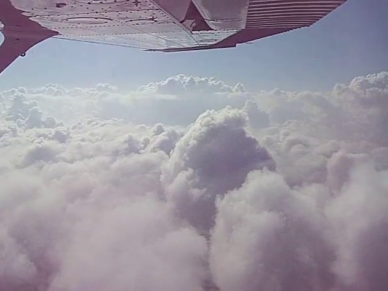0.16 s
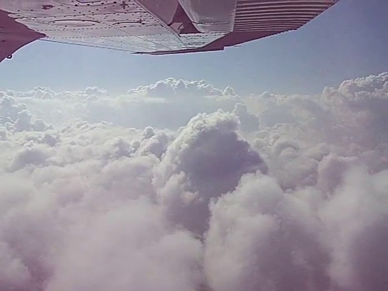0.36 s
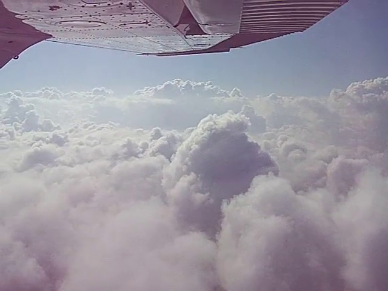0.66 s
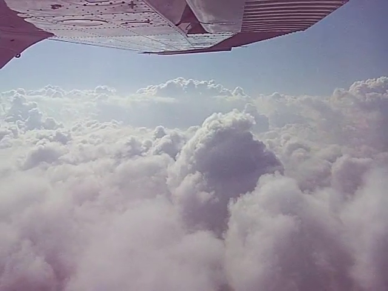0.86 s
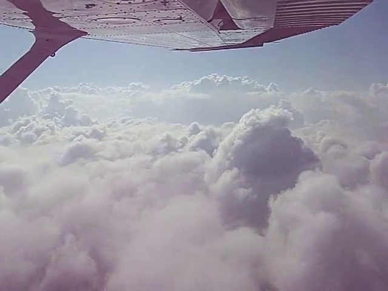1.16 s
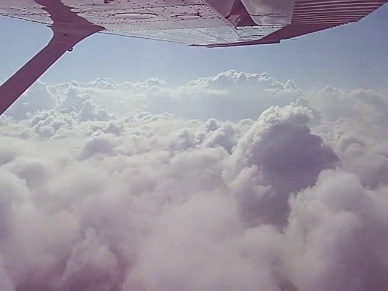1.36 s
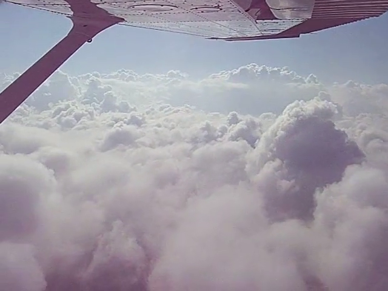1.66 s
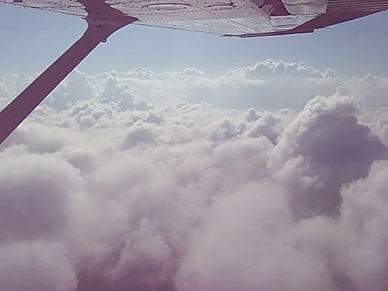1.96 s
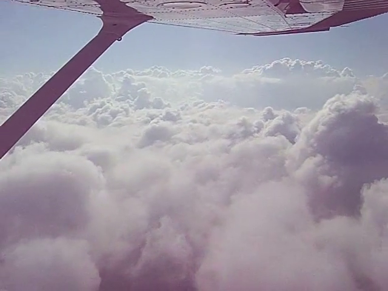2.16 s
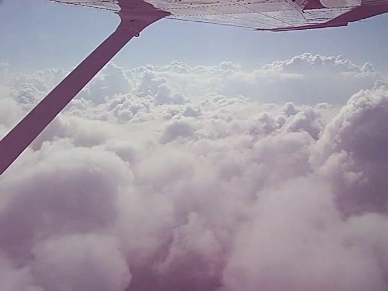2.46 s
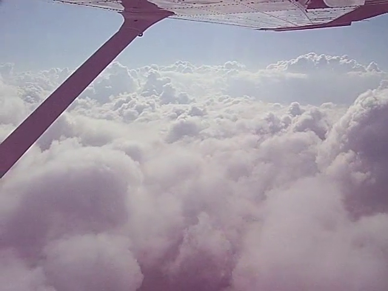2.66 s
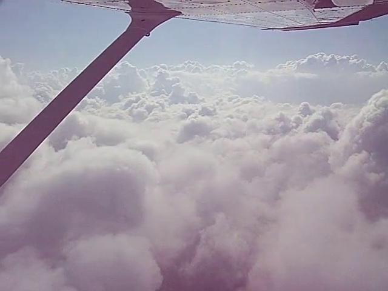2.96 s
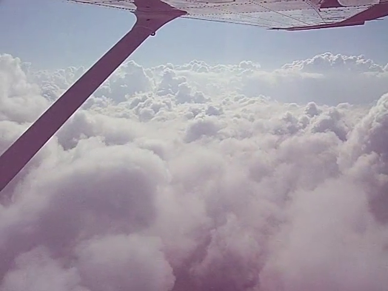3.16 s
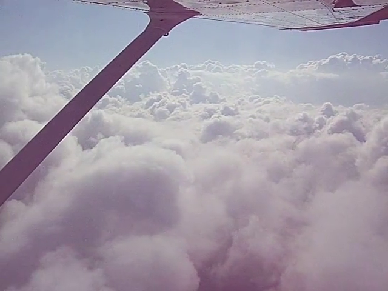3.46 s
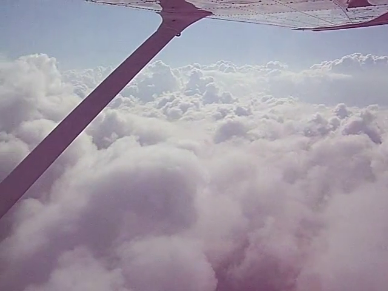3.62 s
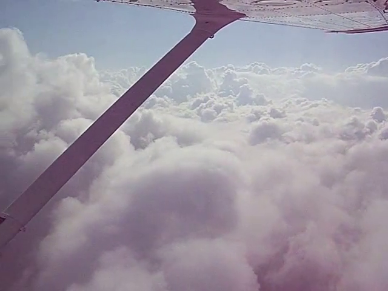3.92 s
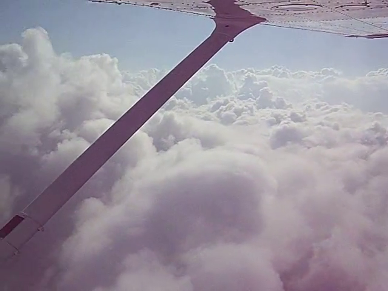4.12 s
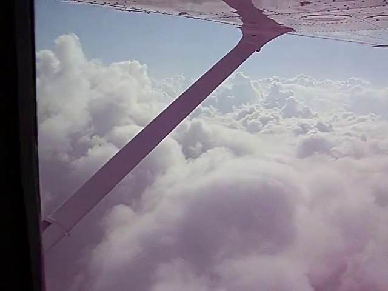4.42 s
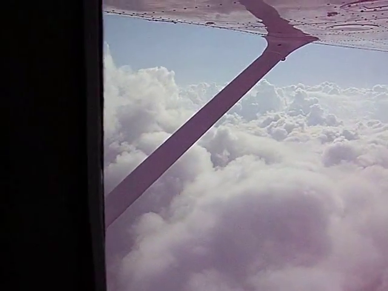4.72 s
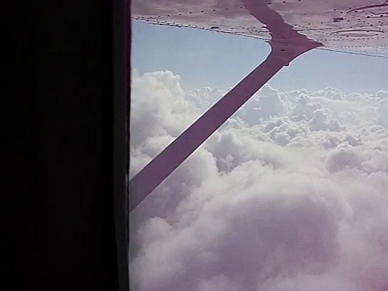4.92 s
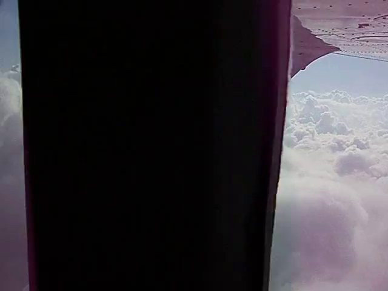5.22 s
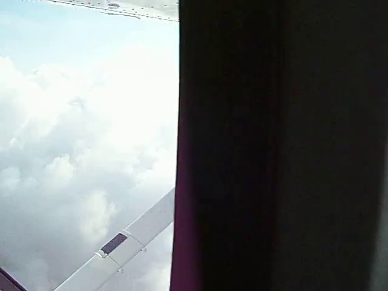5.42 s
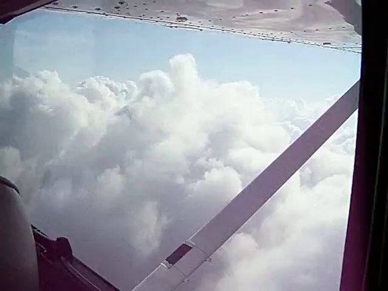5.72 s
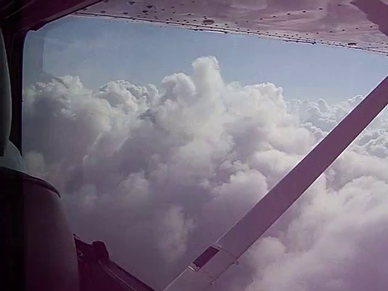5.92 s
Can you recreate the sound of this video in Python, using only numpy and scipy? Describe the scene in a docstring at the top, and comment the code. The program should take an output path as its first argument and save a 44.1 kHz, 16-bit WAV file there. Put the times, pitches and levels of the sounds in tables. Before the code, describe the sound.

Inside a light aircraft cabin, a deep four-cylinder engine and propeller drone dominates without pause, with a rough exhaust rumble and steady air rush beneath. For over four seconds little changes. Then, as the microphone turns along the side window to the door frame, the low tone eases, the air turns hollow and brighter, and short gusts push through the leaks.

```python
"""A deep drone dominates throughout: a four-cylinder engine and its propeller, in a light aircraft's cabin.
Sine harmonics locked to one shaft angle make the drone and its buzz; shaped noise makes the exhaust roar,
the slipstream on the skin, the hiss at the window seals and the resonant and broad leaks at the door.
The listening direction turns along the side window, from the wing tip towards the draughty door frame,
and recolours them all, with a comb-like window reflection; a few gusts push in near the end."""
import sys
import numpy as np
from scipy import signal
from scipy.fft import rfft, irfft, next_fast_len
from scipy.io import wavfile
from scipy.ndimage import uniform_filter1d, map_coordinates

SR = 44100
rng = np.random.default_rng(int(sys.argv[2]) if len(sys.argv) > 2 else 0)


def transcribe(signal):
    """Save signal, clipped to [-1, 1], as a 16-bit WAV file at the path in sys.argv[1]."""
    frames = np.atleast_2d(signal).T
    limited = np.clip(frames, -1, 1)
    pcm = np.round(limited * 32767).astype(np.int16)
    wavfile.write(sys.argv[1], SR, pcm)


N = 268128

# engine speed; a cycle is two turns of the shaft: (time [s], four-stroke cycle rate [Hz])
CYCLE_RATE = [(0, 19.2), (.75, 19.278), (3, 19.312), (5.2, 19.372)]
# turn of the listening direction: (time [s], turn [0 = facing the wing tip, 1 = past the door frame])
LISTENING_TURN = [(0, 0), (3.9, .08), (4.75, .21), (5.15, .32), (5.45, .56), (5.7, .95), (6.08, 1)]

# rms level of the firing tone before its fluctuations: (wing tip [dB], door frame [dB])
FIRING_DB = (-17.5, -20.5)
# rms level of its octave before its fluctuations: (wing tip [dB], door frame [dB])
OCTAVE_DB = (-21.5, -22.5)
# weaker engine and propeller lines, before beaming and flutter: (multiple of cycle rate, peak level [dB])
WEAK_ORDERS = [(1, -29), (2, -43.5), (3, -42), (5, -34), (7, -46.5), (9, -33), (10, -36.5), (11, -35.5),
               (12, -36.5), (13, -50), (16, -44), (18, -44.5), (20, -46), (22, -49.5), (24, -41), (26, -53),
               (28, -50.5), (29, -58), (30, -60.5), (32, -48), (33, -56.5), (36, -62), (37, -58.5),
               (38, -54), (39, -58), (40, -49.5), (41, -49.5), (44, -46.5), (48, -56.5)]
# change of the fully beamed weak lines: (wing tip [dB], door frame [dB])
BUZZ_DB = (2, -1.5)

# spectrum of exhaust and panel noise: (frequency [Hz], relative density [dB per Hz])
ROAR_SPECTRUM = [(8, -31.5), (22, -7), (45, -1), (68, 2.5), (90, -3), (135, -4), (212, -7), (270, -10.5),
                 (340, -12.5), (520, -21.5), (800, -25.5), (1100, -31), (2500, -68.5)]
# spectrum of the cabin standing wave: (frequency [Hz], relative density [dB per Hz])
BOOM_SPECTRUM = [(200, -32), (280, -6.5), (312, 2.5), (350, -3), (390, -18.5), (500, -49.5)]
# level of the standing wave: (wing tip [dB], door frame [dB])
BOOM_DB = (-49, -34)

# spectrum of the air rushing over the skin: (frequency [Hz], relative density [dB per Hz])
SLIPSTREAM_SPECTRUM = [(200, -0.5), (600, 3.5), (850, 4), (1100, 0.5), (1700, -0.5), (2350, -3), (2850, 0),
                       (3250, -2.5), (3650, -10.5), (4150, -27.5), (5000, -56)]
# level of the slipstream before its fluctuations: (wing tip [dB], door frame [dB])
SLIPSTREAM_DB = (-34, -34)
# spectrum of the window seals' hiss before tilting: (frequency [Hz], relative density [dB per Hz])
HISS_SPECTRUM = [(3000, -33), (4200, -16), (4700, -6.5), (5100, -3), (5800, -1.5), (6400, -3), (7000, 0),
                 (7500, 2), (7950, 0), (8350, -9), (8700, -20.5), (9000, -49.5)]
# hiss level, growing as the seal is approached, before tilt and flicker: (time [s], level [dB])
HISS_LEVEL = [(0.2, -44), (5.32, -41.5), (5.69, -38.5), (6.0, -38.5)]

# resonant gap in the door frame, before buffeting: (nearest turn [0-1], reach [turn], level there [dB])
GAP_PLACE = (0.25, .18, -42)
# hollow at the pillar, before buffeting: (nearest turn [0-1], reach [turn], level there [dB])
HOLLOW_PLACE = (0.39, .1, -37)
# broad draught, before buffeting: (nearest turn [0-1], reach [turn], level there [dB])
DRAUGHT_PLACE = (0.87, 0.55, -38.5)
# spectrum of the broad draught: (frequency [Hz], relative density [dB per Hz])
DRAUGHT_SPECTRUM = [(700, -25), (1200, -11), (1600, -1.5), (2000, -1.5), (2400, -5), (2950, -6.5),
                    (3500, -10.5), (4150, -27), (5000, -50)]
# gusts at the door frame, before buffeting: (time [s], half length [s], draught level [dB], gap level [dB])
GUSTS = [(5.634, .06, -36.5, -46), (5.7, .04, -43, -38), (5.87, 0.058, -44, -54)]

# extra path of the pane's reflection: (wing tip [ms], door frame [ms])
PANE_DELAY_MS = (0.19, 0.88)
# strength of that reflection: (strongest turn [0-1], reach [turn], gain there [dB])
PANE_PLACE = (0.31, .42, -9.5)


def amp(db):
    """Decibels are a logarithmic measure of amplitude gain."""
    return 10 ** (np.asarray(db) / 20)


def unit(x):
    """Normalisation: division by the root mean square gives rms 1."""
    return x / np.sqrt(np.mean(x ** 2) + 1e-20)


def curves(rows):
    """Linear interpolation: one value per sample for each column after the time."""
    times, *columns = np.transpose(rows)
    return [np.interp(np.arange(N) / SR, times, column) for column in columns]


def wobble(rate):
    """Slow random fluctuation: a smooth curve through normal deviates, rate knots a second."""
    knots = rng.standard_normal(256)
    coarse = np.linspace(0, N, 2048)
    values = map_coordinates(knots, [coarse * rate / SR], mode="mirror")
    return np.interp(np.arange(N), coarse, values)


def filtered(x, response):
    """Linear filtering: the spectrum of x is multiplied by a response of frequency."""
    size = next_fast_len(N + SR // 2)
    hz = np.fft.rfftfreq(size, 1 / SR)
    return irfft(rfft(x, size) * response(hz), size)[:N]


def noise(spectrum):
    """Spectral shaping: white noise coloured by points on a log-frequency axis, at rms 1."""
    f, db = np.transpose(spectrum)

    def response(hz):
        return amp(np.interp(np.log(hz + 1), np.log(f), db))
    return unit(filtered(rng.standard_normal(N), response))


def cavity(centre_hz, width_hz):
    """Resonance: a cavity selects one band of the air noise, at rms 1."""
    def response(hz):
        return (1 + ((hz - centre_hz) / width_hz) ** 2) ** -2
    return unit(filtered(rng.standard_normal(N), response))


def turned(ends):
    """Directional dependence: a value moves from its first end to its second with the turn."""
    turn, = curves(LISTENING_TURN)
    return ends[0] + (ends[1] - ends[0]) * turn


def bell(x, centre, reach, db):
    """Gaussian weighting: a gain peaks at the centre and fades to both sides."""
    return amp(db) * np.exp(-((x - centre) / reach) ** 2)


def passing(place):
    """Proximity: the gain of a place rises as the turn nears it and falls beyond."""
    turn, = curves(LISTENING_TURN)
    return bell(turn, *place)


def crank():
    """Phase is the integral of frequency: the cycle angle [rad], with a slight unsteadiness of the shaft."""
    rate, = curves(CYCLE_RATE)
    return 2 * np.pi * np.cumsum(rate) / SR + .004 * wobble(7)


def drone(angle, combustion_db):
    """Periodic excitation: four firings and four blade passes a cycle sound a deep tone and its octave."""
    firing_db = turned(FIRING_DB) + combustion_db * wobble(9)
    octave_db = turned(OCTAVE_DB) + .15 * wobble(9)
    firing = amp(firing_db) * np.sin(4 * angle)
    octave = amp(octave_db) * np.sin(8 * angle)
    return np.sqrt(2) * (firing + octave)  # rms to peak


def overtones(angle, flutter_db, beam_hz):
    """Fourier series: unequal cylinders fill in lines between blade harmonics; turbulence flutters each."""
    buzz_db = turned(BUZZ_DB)
    total = np.zeros(N)
    for order, db in WEAK_ORDERS:
        line_hz = order * CYCLE_RATE[0][1]
        beamed = min(line_hz / beam_hz, 1)  # higher lines depend more on the listening direction
        phase = rng.uniform(0, 2 * np.pi) + .2 * wobble(5)
        level_db = db + beamed * buzz_db + flutter_db * wobble(6)
        total += amp(level_db) * np.sin(order * angle + phase)
    return total


def roar(level_db, patchy_db):
    """Turbulence radiates broadband noise: exhaust and shaking panels swell separately from band to band."""
    bands = signal.stft(noise(ROAR_SPECTRUM), nperseg=1024)[2]
    swells = rng.standard_normal(bands.shape)
    swells = uniform_filter1d(swells, size=5, axis=0)  # across frequency
    swells = uniform_filter1d(swells, size=12, axis=1)  # across time
    patchy_bands = bands * amp(patchy_db * unit(swells))
    panels = signal.istft(patchy_bands, nperseg=1024)[1][:N]
    return amp(level_db) * unit(panels)


def cabin_boom():
    """A standing wave concentrates noise in a narrow band, here at a level that follows the turn."""
    return amp(turned(BOOM_DB)) * noise(BOOM_SPECTRUM)


def slipstream():
    """Boundary-layer turbulence: gusty air over the skin gives broad, slowly fluctuating noise."""
    return amp(turned(SLIPSTREAM_DB) + 0.25 * wobble(7.7)) * noise(SLIPSTREAM_SPECTRUM)


def seals():
    """Jet noise through narrow leaks: a fizzing hiss, louder and brighter the nearer it is."""
    level_db, = curves(HISS_LEVEL)
    # per dB of level, the top gains and the lower part loses this many dB
    tilt_db = 0.36 * (level_db - level_db.mean())
    hiss = noise(HISS_SPECTRUM)
    lower = filtered(hiss, lambda hz: 1 / (1 + (hz / 6700) ** 16))  # splits the band at 6700 Hz
    upper = hiss - lower
    aimed = amp(-tilt_db) * lower + amp(tilt_db) * upper
    return amp(level_db + 0.48 * wobble(40)) * aimed


def door_leaks():
    """Resonant and broadband leakage: gap, pillar hollow and draught; gusts add power to gap and draught."""
    t = np.arange(N) / SR
    gap_gain, draught_gain = passing(GAP_PLACE), passing(DRAUGHT_PLACE)
    for time_s, half_s, draught_db, gap_db in GUSTS:
        gap_gain = np.hypot(gap_gain, bell(t, time_s, half_s, gap_db))
        draught_gain = np.hypot(draught_gain, bell(t, time_s, half_s, draught_db))
    gap = gap_gain * cavity(centre_hz=2080, width_hz=260)
    hollow = passing(HOLLOW_PLACE) * cavity(centre_hz=660, width_hz=140)
    draught = draught_gain * noise(DRAUGHT_SPECTRUM)
    return gap + hollow + draught


def airflow():
    """Common modulation: the same eddies drive slipstream, seals and door leaks together."""
    buffet_db = .5 * wobble(20)
    return amp(buffet_db) * (slipstream() + seals() + door_leaks())


def window(x):
    """Interference: the pane adds a late copy of the midrange, whose notch slides down with the turn."""
    def reflection(hz):
        bends_around = 1j * hz / (1j * hz + 600)  # long waves pass around the pane
        scattered = 1 + (hz / 2500) ** 4  # the frame scatters the shortest waves
        return bends_around / scattered
    mirrored = filtered(x, reflection)
    late = np.arange(N) - turned(PANE_DELAY_MS) * SR / 1000
    return x + passing(PANE_PLACE) * map_coordinates(mirrored, [late])


def scene():
    """Superposition: engine and air add linearly, heard beside the window."""
    angle = crank()
    engine = drone(angle, combustion_db=.5)
    engine += overtones(angle, flutter_db=0.87, beam_hz=450)
    engine += roar(level_db=-23.5, patchy_db=-1.0) + cabin_boom()
    return window(engine + airflow())[None]


def record(dry):
    """Band limitation: nothing at or above 9000 Hz is kept."""
    return filtered(dry[0], lambda hz: hz < 9000)[None]


dry = scene()
out = record(dry)
transcribe(out)
```